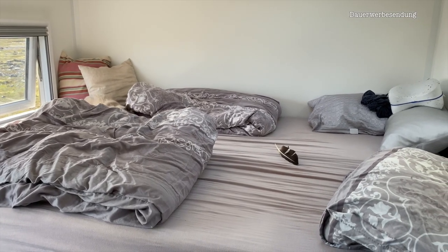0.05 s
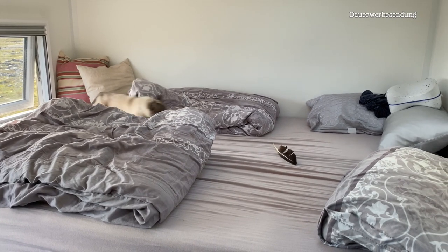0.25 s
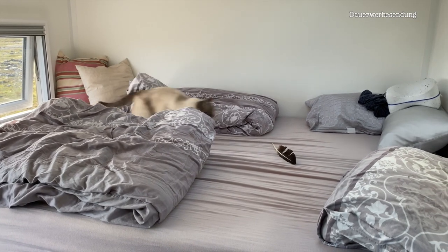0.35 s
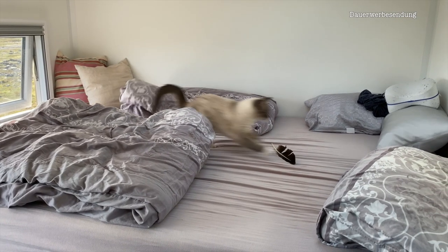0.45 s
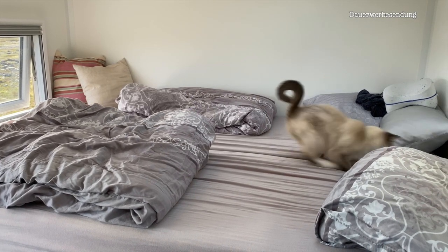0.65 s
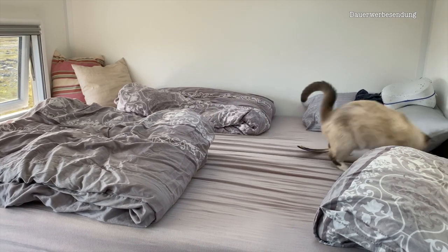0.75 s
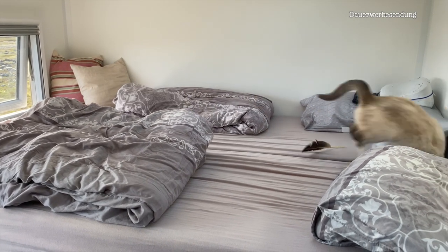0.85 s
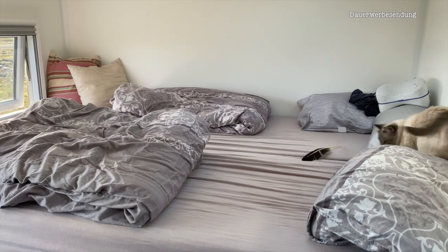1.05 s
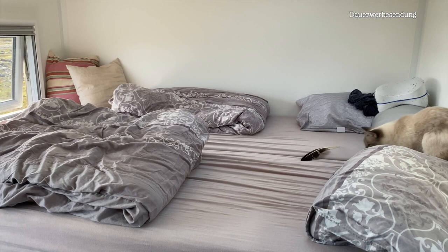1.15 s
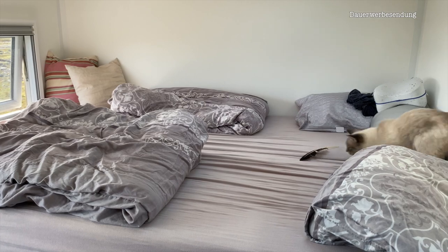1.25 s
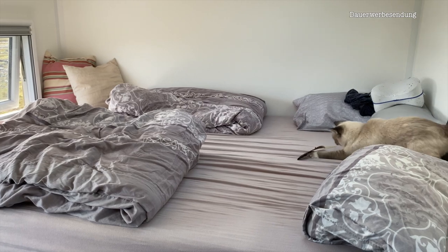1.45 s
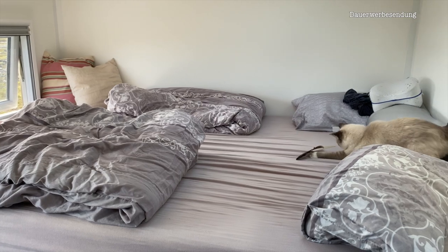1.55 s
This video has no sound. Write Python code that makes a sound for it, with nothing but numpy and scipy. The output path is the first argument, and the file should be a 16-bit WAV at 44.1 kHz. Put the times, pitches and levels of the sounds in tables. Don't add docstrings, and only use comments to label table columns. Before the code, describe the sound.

Muffled paw thumps on a bed quicken and grow heavy, with fabric scuffs and padding knocks, ease off, then one more landing and a faint whistling skid over cloth; small dry room, close microphones.

```python
import sys
import numpy as np
from scipy import signal
from scipy.fft import rfft, irfft, next_fast_len
from scipy.io import wavfile
from scipy.ndimage import uniform_filter1d

SR = 44100
rng = np.random.default_rng(int(sys.argv[2]) if len(sys.argv) > 2 else 0)


def file_out(sig):
    cols = np.atleast_2d(sig).T
    lim = np.clip(cols, -1, 1)
    pcm = np.round(lim * 32767).astype(np.int16)
    wavfile.write(sys.argv[1], SR, pcm)


def volts(x):
    e = np.asarray(x, float) / 20
    return 10 ** e


N = 70560
T = np.arange(N) / SR

# [f/Hz, level/dB]
AIR_COLOUR = [(24, -34), (40, 1), (91, 0.5), (354, -13), (715, -20.5), (1300, -31), (2260, -34),
              (13100, -47.5), (16000, -27)]
# [f/Hz, likeness/0..1]
EAR_LIKENESS = [(60, 0.82), (380, 0.26), (2380, 0.023), (15000, 0.075)]
# [t/s, rumble level/dB, rustle level/dB]
BED_STIR = [(0.0, -71.5, -81), (0.12, -68, -76), (0.2, -59, -73.5), (0.4, -61.5, -79.5), (0.552, -51, -73),
            (0.8, -54.5, -81.5), (1.0, -58, -78.5), (1.07, -70.5, -80.5), (1.162, -60, -84.5),
            (1.42, -63, -97), (1.47, -75.5, -80.5), (1.6, -80.5, -81)]
# [f/Hz, width/Hz, level/dB]
BED_MODES = [(49.7, 29.7, 0.5), (91, 31.7, 2), (127.7, 36.3, -1), (197.7, 54.4, -9), (245.4, 39, -8.5),
             (354, 97, -24.5)]
# [f/Hz, level/dB per Hz]
CLOTH_COLOUR = [(500, -4.5), (1200, -5), (2200, -2.5), (4000, -7), (7000, -11), (8000, -17), (13000, -16.5),
                (15800, -13)]
# [t/s, peak level/dB, f/Hz]
PAW_THUMPS = [(0.057, -57, 91), (0.083, -60, 89), (0.152, -45.5, 195), (0.205, -46, 89.5),
              (0.22, -42, 66.4), (0.247, -56, 91), (0.28, -55, 120), (0.303, -50, 81.7), (0.352, -48, 139),
              (0.382, -40.5, 84), (0.412, -33, 192.7), (0.423, -36.5, 78), (0.44, -36.5, 66.5),
              (0.473, -43, 138), (0.491, -41, 86.6), (0.519, -29.5, 162.2), (0.539, -32.5, 88),
              (0.575, -32, 97.5), (0.632, -33.5, 158), (0.692, -37.5, 131), (0.721, -39, 78.6),
              (0.762, -33.5, 185), (0.774, -33, 115), (0.79, -36, 172), (0.803, -39, 120),
              (0.855, -52, 100), (0.897, -47, 133), (0.922, -45, 112), (0.946, -46.5, 106),
              (0.969, -49.5, 142), (1.026, -55, 79), (1.11, -32.5, 137), (1.137, -35, 107),
              (1.191, -52, 65.4), (1.222, -49.5, 73), (1.269, -45, 76), (1.297, -46.5, 89),
              (1.327, -41.5, 137.6), (1.363, -43, 63), (1.403, -46, 67), (1.44, -60, 120)]
# [t/s, peak level/dB, t60/s, tilt/dB per octave]
CLOTH_SCUFFS = [(0.06, -57.5, 0.096, 2.5), (0.132, -54.5, 0.17, -7), (0.1459, -50, 0.073, -6.5),
                (0.189, -63.5, 0.21, 1.5), (0.228, -56, 0.16, -4), (0.2574, -55.5, 0.056, -2),
                (0.3455, -59.5, 0.36, -2.5), (0.392, -55.5, 0.19, -4.5), (0.4129, -34, 0.042, 4),
                (0.4187, -38, 0.049, 2.5), (0.514, -32, 0.057, 2), (0.54, -60, 0.24, 3),
                (0.598, -64, 0.16, 6), (0.619, -43.5, 0.097, -9), (0.7042, -55, 0.083, -3),
                (0.757, -46.5, 0.089, -6), (0.799, -45, 0.065, -5), (0.8718, -51, 0.077, -2),
                (1.0031, -71, 0.068, -19), (1.118, -49.5, 0.078, -5.5), (1.14, -64, 0.18, -15.5),
                (1.19, -65.5, 0.42, -10.5), (1.269, -69, 0.38, -12)]
# [f/Hz, width/Hz, level/dB]
SNAG_MODES = [(1328, 49, 5), (2300, 75, 11), (3870, 77, -7), (6320, 310, 9.5)]
# [t/s, level/dB, f/Hz, t60/s]
BED_KNOCKS = [(.146, -56.5, 333, 0.085), (.155, -53.5, 221, 0.11), (.147, -58, 2250, 0.057),
              (0.225, -68.5, 1590, 0.11), (0.244, -56, 209, 0.077), (0.346, -49.5, 247.6, 0.13),
              (.346, -60, 704, 0.047), (.362, -59, 600, .06), (.413, -40, 291, 0.054),
              (.445, -59.5, 400, 0.14), (0.477, -51, 190, 0.1), (0.517, -42.5, 497, 0.074),
              (.522, -42.5, 569, 0.061), (.521, -44.5, 371.4, 0.1), (.621, -50, 760, 0.049),
              (.62, -51, 900, 0.036), (0.716, -48, 270, 0.066), (.762, -48.5, 234.7, 0.12),
              (.762, -53.5, 520, 0.054), (0.776, -45, 149, 0.11), (.79, -59, 329, 0.078),
              (.798, -56.5, 509, 0.074), (.873, -61.5, 894, 0.048), (.900, -53, 260, 0.16),
              (.938, -54, 653, 0.063), (0.984, -55, 223, 0.077), (1.007, -50, 254, 0.053),
              (1.106, -47, 245, 0.065), (1.117, -43, 337, 0.092), (1.1195, -34.5, 735, 0.033),
              (1.149, -50, 230, 0.12), (1.23, -65.5, 290, .15), (1.289, -62.5, 193, 0.13),
              (1.318, -62.5, 687, 0.049), (1.321, -56, 317, 0.07)]
# [f/Hz, width/Hz, level/dB]
PUFF_MODES = [(260, 65, 2.0), (392, 145, 0.5), (760, 302, -8.5)]
# [t/s, level/dB, ring f/Hz, t60/s]
CLAW_SNAPS = [(.4118, -37.5, 1980, 0.043), (.4135, -47.5, 3900, 0.063), (.4125, -38.5, 1260, 0.02),
              (.5150, -36, 4180, 0.014), (.5152, -39.5, 6300, 0.025), (.5155, -36, 2500, 0.013),
              (.519, -42, 5400, 0.021), (.5265, -49, 2060, 0.053), (.5151, -41, 6100, 0.0066),
              (.5148, -43, 10900, 0.0088), (.5146, -36, 12600, 0.0083), (.5147, -33.5, 14700, 0.01)]
# [t/s, level/dB, whistle f/Hz, brightness/dB]
FUR_SLIDE = [
    (1.137, -72, 2230, -22),
    (1.165, -63.5, 2308, -8.5),
    (1.235, -67.5, 2200, 2.5),
    (1.262, -64, 2265, -1.5),
    (1.326, -64.5, 2300, -8),
    (1.375, -66, 2180, -8.5),
    (1.44, -64, 2300, -19),
    (1.49, -69.5, 2180, -5),
    (1.518, -81, 2200, -8),
]
# [f/Hz, width/Hz, level/dB]
WEAVE_MODES = [(2200, 280, 10.5), (1615, 170, 2.5), (3840, 260, -3)]
# [f/Hz, level/dB per Hz]
FUR_COLOUR = [(1400, 2), (2700, -0.5), (3400, 6), (4100, -2), (4700, -8), (5600, -9), (8000, -53)]
# [f/Hz, side minus mid level/dB]
PAIR_WIDTH = [(60, -23), (180, -11.5), (550, 2), (1650, -0.5), (4970, 4), (15000, -1)]
# [f/Hz, phase/rad]
PAIR_TURN = [(60, 1.5), (150, 1.0), (300, 1.36), (700, 1.58), (1400, 0.81), (2800, 1.32), (5600, 3.14),
             (10000, 1.47)]
# [start t/s, end t/s, level/dB]
HISS_SPANS = [
    (.06, .3, -82),
    (.3, .34, -95),
    (.34, 1.04, -87),
    (.413, .43, -58),
    (.43, .513, -74),
    (.6, .645, -78),
    (1.1, 1.16, -89),
    (1.16, 1.25, -100),
    (1.25, 1.46, -82),
]


def rms_one(x):
    return x / np.sqrt(np.mean(x ** 2) + 1e-20)


def in_time(rows):
    s, *columns = np.transpose(rows)
    return [np.interp(T, s, column) for column in columns]


def at_hz(points, hz):
    point_hz, value = np.transpose(points)
    return np.interp(np.log(hz), np.log(point_hz), value)


def drift(rate_hz):
    r = np.exp(-80 * np.pi * rate_hz / SR)
    noise = rng.standard_normal(N // 40 + 2002)
    slow = signal.lfilter([1], [1, -2 * r, r * r], noise)[2000:]
    return np.interp(np.arange(N) / 40, np.arange(len(slow)), rms_one(slow))


def resonate(x, modes):
    out = 0
    for k, (hz, width_hz, db) in enumerate(modes):
        r = np.exp(-np.pi * width_hz / SR)
        feedback = [1, -2 * r * np.cos(2 * np.pi * hz / SR), r * r]
        ring = signal.lfilter([(1 - r * r) / 2, 0, (r * r - 1) / 2], feedback, x)
        out = out + (-1) ** k * volts(db) * ring
    return out


def burst(s, rise_s, t60_s):
    t = np.maximum(T - s, 0)
    return (1 - np.exp(-t / rise_s)) ** 2 * volts(-60 * t / t60_s)


def bands(x, spectrum):
    bottom, top = spectrum[0][0], spectrum[-1][0]
    edges = np.geomspace(bottom, top, int(2 * np.log2(top / bottom)) + 2)
    for k, (low, high) in enumerate(zip(edges, edges[1:])):
        hz = np.sqrt(low * high)
        sos = signal.butter(2, [low, high], "band", fs=SR, output="sos")
        yield hz, volts(at_hz(spectrum, hz)) * signal.sosfilt(sos, x[k % 2])


def hiss(spectrum, patchy_db):
    out = 0
    for hz, (mid, side) in bands(rng.standard_normal((2, 2, N)), spectrum):
        alike = np.clip(at_hz(EAR_LIKENESS, hz), 0, 1)
        stereo = np.sqrt(1 + alike) * mid + np.sqrt(1 - alike) * side * [[1], [-1]]
        out = out + volts(patchy_db * drift(5.3)) * stereo
    return rms_one(out)


def air():
    return volts(-66.5) * hiss(AIR_COLOUR, patchy_db=-2.0)


def rumble():
    rumble_db, _ = in_time(BED_STIR)
    level = volts(rumble_db + 4 + 2 * drift(14.4))
    return level * rms_one(resonate(rng.standard_normal(N), BED_MODES))


def rustle():
    _, rustle_db = in_time(BED_STIR)
    level = volts(rustle_db + 1.44 * drift(34))
    return level * hiss(CLOTH_COLOUR, patchy_db=-1.5)


def thumps():
    sag_s, rest_hz, sag_from = 0.013, 88, 1.473
    out = np.zeros(N)
    for s, db, hz in PAW_THUMPS:
        t = np.maximum(T - s, 0)
        rest = min(hz, rest_hz)
        sag_hz = sag_from * (hz - rest + 10)
        turns = rest * t + sag_hz * sag_s * (1 - np.exp(-t / sag_s))
        out += volts(db + 2.5) * burst(s, rise_s=0.0026, t60_s=0.13) * np.sin(2 * np.pi * turns)
    return out


def grains():
    per_second, spread_db = 20000, 2.5
    size = volts(spread_db * np.minimum(rng.exponential(1, N), 4))
    sign = rng.choice([-1, 1], N)
    return rms_one(size * sign * (rng.random(N) < per_second / SR))


def scuffs():
    fibres = np.array([grains(), grains()])
    fibres = fibres + resonate(fibres, SNAG_MODES)
    parts = list(bands(fibres, CLOTH_COLOUR))
    spread = np.std(sum(band for hz, band in parts))
    shapes, rise_s = [], 0.0015
    for s, db, t60, tilt in CLOTH_SCUFFS:
        soft_rise_s = rise_s * volts(-0.6 * (db + 33.5))
        shapes.append(volts(db - 7) * burst(s - rise_s, soft_rise_s, max(t60, 0.02)))
    drag_s, drag_end_s, drag_tilt_db = 0.425, 0.513, 1.5
    edges = np.clip(np.minimum(T - drag_s, drag_end_s - T) / 0.0052, 0, 1)
    shapes.append(volts(-59 - 56 * (T - drag_s)) * edges)
    tilts = np.append(np.array(CLOTH_SCUFFS)[:, 3], drag_tilt_db)
    return sum(band * (volts(tilts * np.log2(hz / 2000)) @ shapes) for hz, band in parts) / spread


def knocks():
    puff = resonate(rng.standard_normal(N), PUFF_MODES)
    dull = signal.butter(2, 1300, fs=SR, output="sos")
    puff = volts(-7.5) * rms_one(signal.sosfilt(dull, puff))
    rough = 1 + 0.25 * drift(40)
    out = np.zeros(N)
    for s, db, hz, t60 in BED_KNOCKS:
        ring = rough * np.sin(2 * np.pi * hz * (T - s))
        out += volts(db + 5) * burst(s, 0.0028, t60) * (ring + puff)
    return out


def claws():
    out = np.zeros(N)
    for s, db, hz, t60 in CLAW_SNAPS:
        out += volts(db) * burst(s, 0.00018, t60) * np.sin(2 * np.pi * hz * (T - s))
    return out


def slide():
    db, hz, bright_db = in_time(FUR_SLIDE)
    start_s, end_s = FUR_SLIDE[0][0], FUR_SLIDE[-1][0]
    level = volts(db - 82 * np.maximum(T - end_s, 0)) * np.clip((T - start_s) / 0.0059, 0, 1)
    level = level + volts(-70.5) * burst(1.53, 0.0086, 0.25)
    waver = 1 + 0.3 * drift(35)
    blurred_hz = hz + 38.2 * drift(77)
    line = waver * np.sin(2 * np.pi * np.cumsum(blurred_hz) / SR)
    weave = volts(-5.5) * rms_one(resonate(rng.standard_normal(N), WEAVE_MODES))
    return level * (line + weave), level * volts(bright_db) * hiss(FUR_COLOUR, patchy_db=1.7)


def ports(x):
    hz = np.fft.rfftfreq(N, 1 / SR) + 1
    turn = volts(at_hz(PAIR_WIDTH, hz) - 2.5) * np.exp(1j * at_hz(PAIR_TURN, hz))
    side = irfft(rfft(x) * turn, N)
    return np.array([x + side, x - side])


def bedroom(x):
    t60_s, wall_cut_hz = 0.26, 7800
    out, size = np.zeros((2, N)), next_fast_len(N + SR)
    w = 2 * np.pi * np.fft.rfftfreq(size)
    dull = np.exp(-2 * np.pi * wall_cut_hz / SR)
    wall = (1 - dull) / (1 - dull * np.exp(-1j * w))
    spectrum = rfft(x, size)
    lags = (rng.uniform(0.004, 0.03, 16) * SR).astype(int)
    for k, lag in enumerate(lags):
        loop = volts(-60 * lag / SR / t60_s) * wall * np.exp(-1j * w * lag)
        out[k % 2] += irfft(spectrum * loop / (1 - loop), size)[:N] * (-1) ** (k // 2)
    return out


def scene():
    bed = rumble()
    whistle, fur = slide()
    low = thumps() + knocks() + bed
    cloth = scuffs() + whistle
    folds = rustle()
    direct = ports(low + cloth + claws())
    walls = volts(-15.5) * bedroom(cloth + 0.45 * low)
    return direct + walls + fur + folds + air()


def top_cut(x):
    return signal.sosfilt(signal.butter(12, 16650, fs=SR, output="sos"), x)


def record(dry):
    mid_cut_hz, side_cut_hz, top_hz, gate_hz = 15780, 10900, 14000, 12900
    x = signal.sosfilt(signal.butter(4, 48, "high", fs=SR, output="sos"), dry)
    top_band = signal.butter(4, [top_hz, mid_cut_hz], "band", fs=SR, output="sos")
    top = rms_one(signal.sosfilt(top_band, rng.standard_normal(N)))
    level, is_open = np.zeros(N), np.zeros(N)
    for s, end, db in HISS_SPANS:
        inside = (T > s) * (T < end)
        level += volts(db) * inside
        is_open = np.maximum(is_open, inside)
    x = x + top * volts(drift(9)) * level
    hz = np.fft.rfftfreq(N, 1 / SR)
    shut = uniform_filter1d(1 - is_open, size=200)
    x = x - shut * irfft(rfft(x) * (hz > gate_hz), N)
    mid = irfft(rfft(x[0] + x[1]) * np.where(hz < mid_cut_hz, 1, volts(-22)), N) / 2
    side = irfft(rfft(x[0] - x[1]) * np.where(hz < side_cut_hz, 1, volts(-16)), N) / 2
    return top_cut(np.array([mid + side, mid - side]))


dry = scene()
out = record(dry)
file_out(out)
```